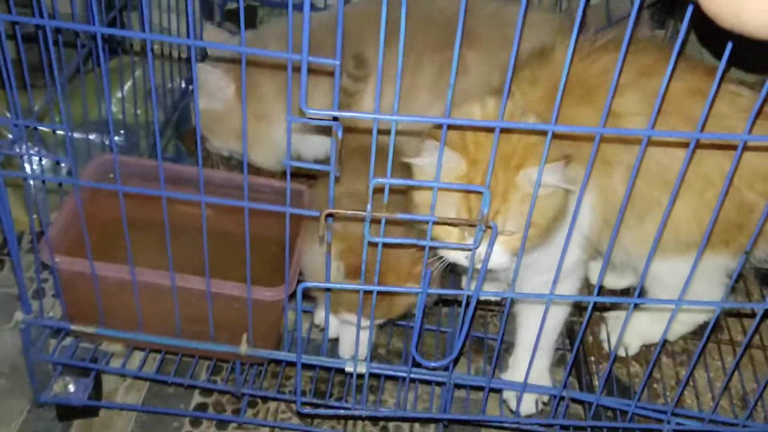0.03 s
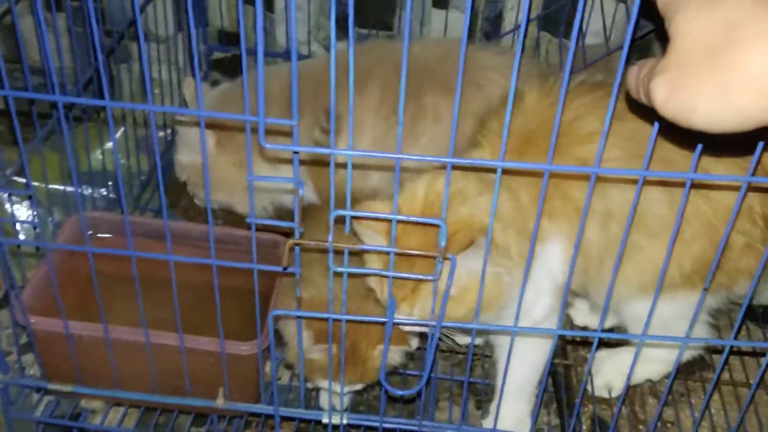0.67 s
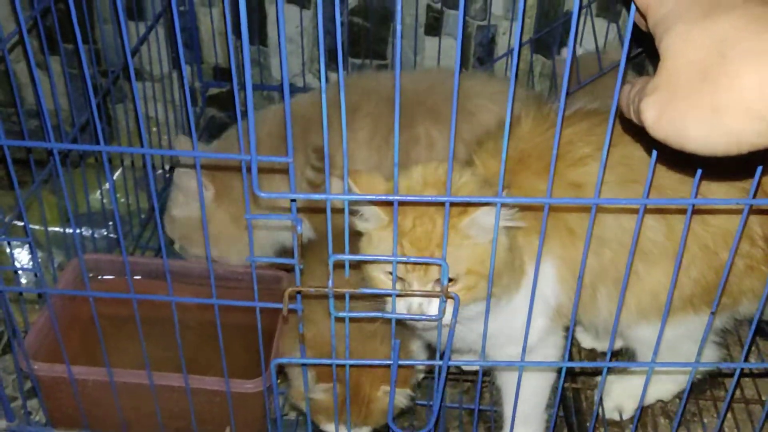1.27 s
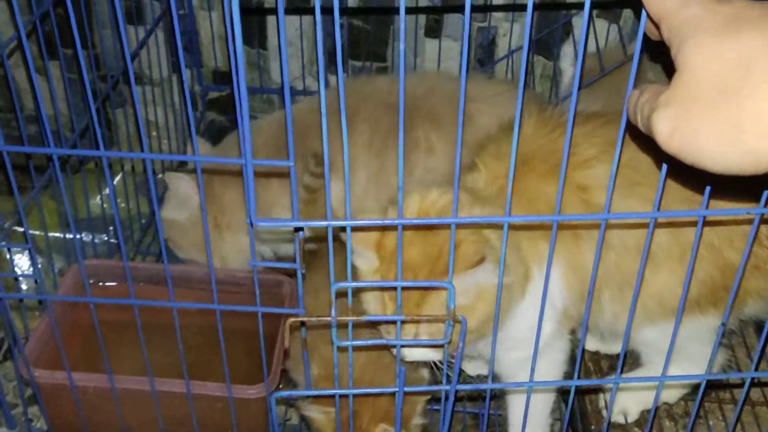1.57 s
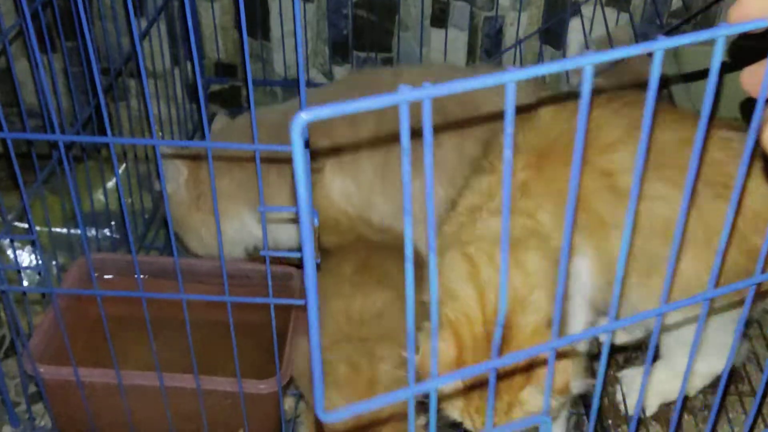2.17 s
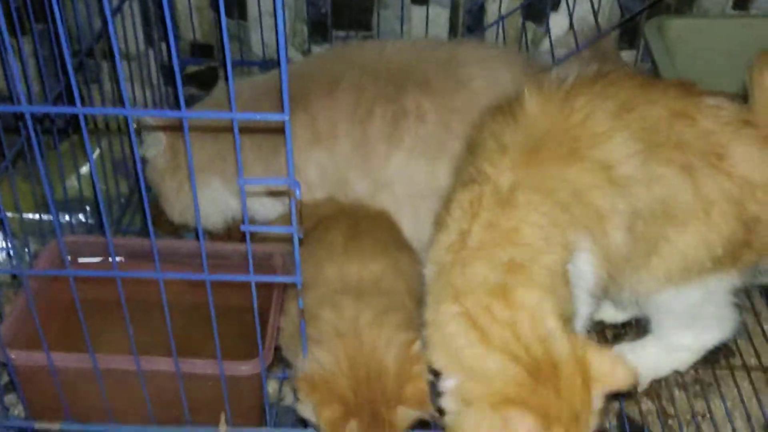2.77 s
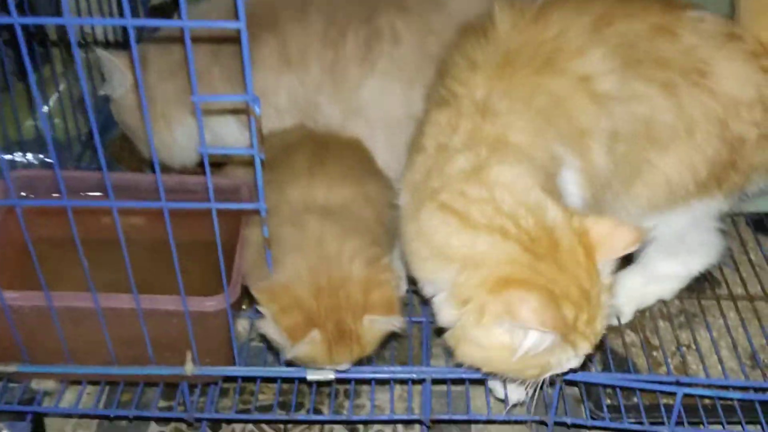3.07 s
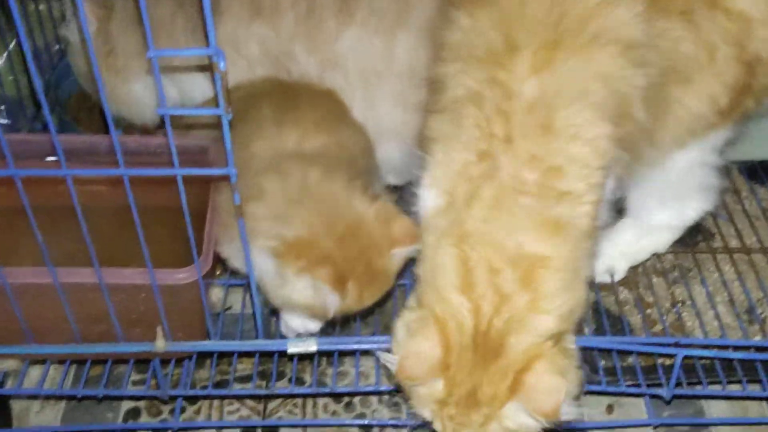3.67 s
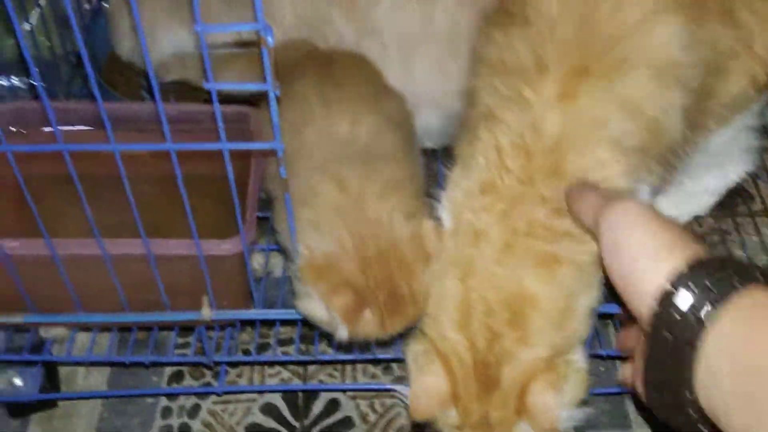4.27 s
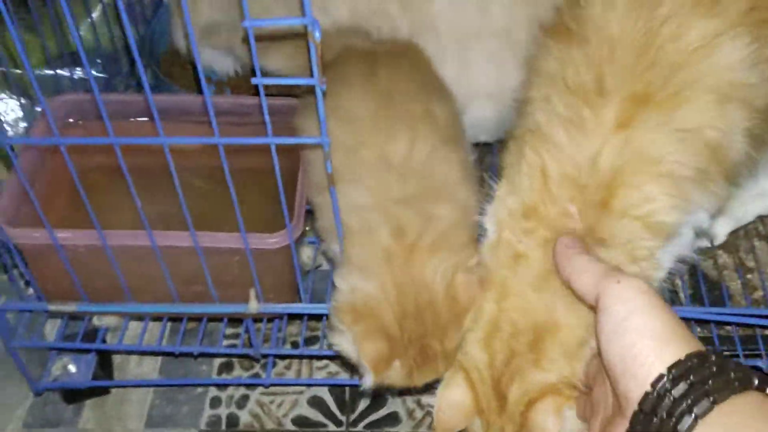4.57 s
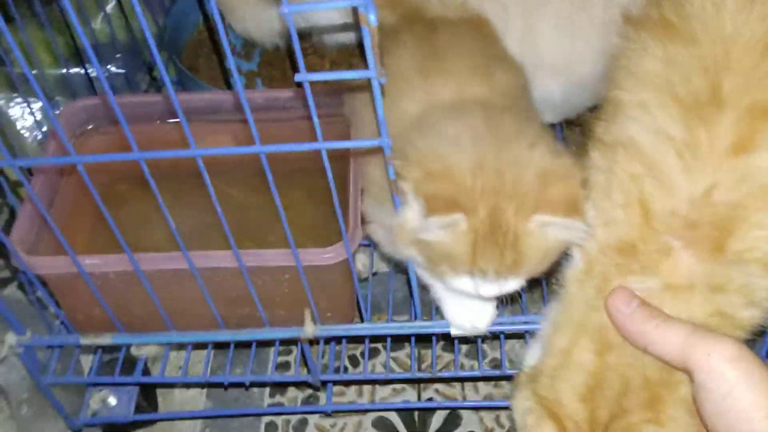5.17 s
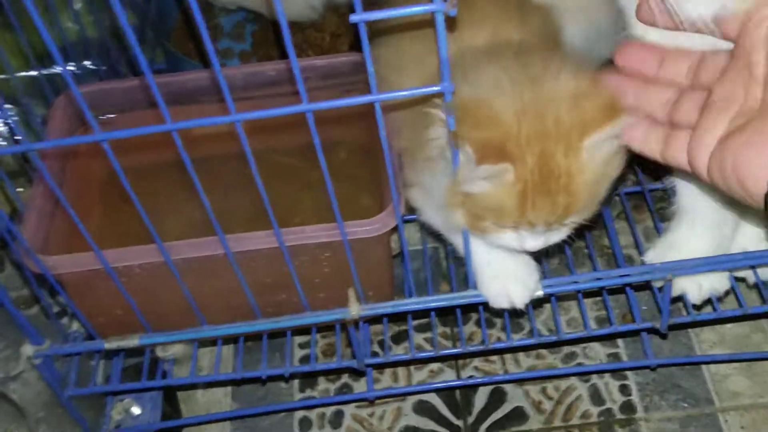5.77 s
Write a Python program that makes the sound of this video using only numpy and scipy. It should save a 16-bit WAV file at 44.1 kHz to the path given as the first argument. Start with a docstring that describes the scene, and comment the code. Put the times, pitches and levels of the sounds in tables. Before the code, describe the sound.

Cats feed in a wire cage, making light, irregular knocks and scrapes on the bars and tray. The door squeaks faintly and rubs as it swings open. Crisp crackles close on the left build into a brief rustle, a few scuffs and soft paw bumps follow, and one sharp clack rings through the hard room. A faint handling rumble lies underneath.

```python
"""Cats feed in a wire cage in a hard, tiled room, heard from the stereo microphones of a hand-held camera.
Paws bump and scrape; light knocks sound the tray, frame, wires and bars. A faint, thin whistle wavers.
The door squeaks and rubs as a hand swings it open and reaches in. Something crisp crackles right by the
left microphone, a few scuffs follow, and one sharp clack rings through the room. Underneath lie the
soft stir of fur and chewing, room tone and a faint handling rumble."""
import sys
import numpy as np
from scipy import signal
from scipy.fft import rfft, irfft, next_fast_len
from scipy.io import wavfile
from scipy.ndimage import uniform_filter1d, map_coordinates

SR = 44100
rng = np.random.default_rng(int(sys.argv[2]) if len(sys.argv) > 2 else 0)


def put_to_file(sound):
    """Save the sound as 16-bit audio at rate SR, in the file named by the first command-line argument."""
    columns = np.atleast_2d(sound).T  # one column per channel
    safe = np.clip(columns, -1, 1)
    whole_steps = np.round(safe * 32767)
    wavfile.write(sys.argv[1], SR, whole_steps.astype(np.int16))


N = 265482

# Levels in the tables are relative: each layer gets its own gain further down.
# light knocks on the cage: start_s, level_db, tray_offset_db, wires_offset_db, bar_offset_db, bar_hz
KNOCKS = [(0.06, -45.5, -8.5, -3, 5.5, 1600), (0.0864, -49.5, -30, 13, 0, 2130),
          (0.166, -54, -18, 13, -1, 1780), (1.241, -65, -21, -15, 1, 1310), (1.284, -71, -6, -15, 2, 1290),
          (1.304, -64, 4, -15, -3, 1000), (1.332, -59, -11, -12, -1, 1900),
          (1.442, -69, -17, -14, -1, 1260), (1.4704, -52, -12, -18, -2, 1140),
          (1.48, -62, -15, -12, -4, 1480), (1.531, -61.5, -5, -19, 11, 1790),
          (1.551, -60, -19, 11, -12, 1870), (1.564, -47, -13.5, -5, -9, 1290),
          (1.573, -50, -10, -3, -1, 1770), (1.583, -57, -9, -8, -5, 1270), (1.647, -63, -15, -15, 9, 1240),
          (1.657, -56.5, -20, -10, 4, 1790), (1.7107, -36.5, -38, -8, -5, 3110),
          (1.718, -45.5, -34, -3.5, -16, 1620), (1.732, -45.5, -31, -8, -3, 2960),
          (1.8681, -45, -22, -7.5, 0, 2050), (1.9332, -53.5, -15, -16, 5, 1640),
          (1.9925, -50, -5, -12, 6.5, 1530), (2.011, -42, -6.5, -11, 2, 1140),
          (2.019, -43.5, -5, -16, -3, 1700), (2.0372, -45.5, -4, 8, -5, 1680),
          (2.1807, -49.5, -13.5, -11, -6, 1590), (2.203, -54, -12.5, 4, -10, 1890),
          (2.308, -55.5, -9, -19, 0, 1520), (2.335, -51.5, -11, -18, 6, 1800),
          (2.354, -52, -14, -19, 1, 1700), (2.37, -55, -10, -19, -2, 1400), (2.385, -50, -5, -4, 4, 1880),
          (2.406, -42, -8.5, -6, 1.5, 1650), (2.4505, -56, -22, -4, 2, 1980),
          (2.457, -45, -30, -2.5, -3, 4320), (2.733, -60, 0, -17, 17, 930),
          (2.769, -42.5, -13, 0, -1, 1640), (2.8803, -53.5, -1, 4.5, 3, 750),
          (2.953, -52.5, -9, -16, 2, 1590), (3.0074, -34.5, -21, 0.5, -8, 1270),
          (3.025, -46.5, -11, 1, -8, 1490), (3.322, -43.5, -10, 1, 0.5, 1080),
          (3.37, -57.5, -8, -7, 9, 1300), (3.4981, -42, -16, -16, -9, 1150),
          (3.645, -53.5, -11, 4, -4.5, 1340), (4.044, -45.5, -18, -21, 1, 1095),
          (4.2667, -50.5, -26, 6.5, 5, 1880), (4.278, -52.5, -25, -6, 8, 1060),
          (4.301, -51.5, -19, 1, 0, 1080), (4.337, -50, -17, -1, 6.5, 1300),
          (4.364, -49.5, -5, -15, 10, 1150), (4.421, -43.5, -7, 6, 2, 1160), (4.441, -54, -10, -2, 4, 1030),
          (4.452, -50, -5, 7, 8, 1250), (4.548, -59, -12, -15, 6, 1250), (4.592, -54, -9, -16, 3.5, 1320),
          (4.647, -57.5, -11, -11, 15, 1150), (4.6622, -46, -11.5, 3, 5, 950),
          (4.686, -44.5, -20, 1.5, -9, 1170), (4.797, -49, -15, -12, 5, 2390),
          (4.8641, -32.5, -15, -2, 0.5, 2344), (4.867, -43.5, -8, 7, 10.5, 946),
          (5.553, -63, -26, 14.5, -8, 1970), (5.9654, -57, -20, 13, 7, 4500)]
# spectra of the hollow floor tray, the frame and the thin wires: frequency_hz, level_db
TRAY_TONE = [(120, -15), (300, -11.5), (550, 10), (750, 1.5), (1100, 5), (1600, -21.5)]
FRAME_TONE = [(300, -13.5), (650, -13), (1000, -10.5), (1600, -1), (2400, -5), (3200, -3), (5000, -5.5),
              (7500, -12), (12000, -39.5)]
WIRE_TONE = [(1500, -7.5), (3500, -15.5), (5000, -10), (7000, -6.5), (9000, 4), (10200, -3), (12000, -5.5),
             (14200, -22)]
# soft paw bumps on the cage floor: start_s, level_db, pitch_hz
PAW_BUMPS = [(3.372, -62.5, 246), (4.219, -64.5, 403), (4.28, -64, 246), (4.468, -62, 156),
             (4.797, -67, 192), (5.13, -61, 253), (5.185, -60, 470), (5.402, -60.5, 450)]
# scrapes along the wires, and at 2.8 s gritty catches of the rubbing door: middle_s, length_s, level_db
SCRAPES = [(1.31, 0.27, -67), (1.46, 0.21, -67), (1.585, 0.032, -61), (1.66, 0.13, -65), (1.8, 0.62, -67),
           (2.08, 0.13, -64), (2.41, 0.18, -58), (2.8, 0.17, -59.5), (3.06, .12, -62.5), (3.73, 0.057, -55),
           (4.47, 0.17, -61), (4.69, 0.063, -53.5), (5.41, 0.047, -60)]
# crisp crackles right by the left microphone: start_s, level_db
CRACKLES = [(3.008, -33.5), (3.1463, -36), (3.2685, -47.5), (3.3135, -47), (3.384, -44), (3.3942, -33.5),
            (3.4124, -29), (3.421, -24), (3.4273, -18.5), (3.435, -33), (3.4520, -32.5), (3.5215, -42),
            (3.5332, -38), (3.54, -28), (3.5515, -42), (3.5927, -44), (3.599, -41), (3.6067, -43.5),
            (3.6225, -53), (3.6653, -45), (3.696, -39.5), (3.7413, -41), (3.7563, -38), (3.771, -31),
            (3.7812, -30), (3.829, -32), (3.894, -23), (3.9352, -16), (3.9497, -22), (3.957, -15),
            (4.257, -39.5), (4.2945, -46), (4.409, -39), (4.42, -47), (4.6625, -44), (5.1456, -42),
            (5.3548, -29)]
# pushes of the close rustle: peak_s, level_db, left_over_right_db
RUSTLE_PUSHES = [(3.764, -40, 2), (3.785, -34, 4), (3.8, -31.5, 7), (3.816, -37, 6), (3.836, -29, 7),
                 (3.86, -27.5, 4), (3.877, -24.5, 3), (3.902, -18, 3), (3.913, -22, -1), (3.927, -14, -1),
                 (3.936, -14, 1), (3.948, -15, 1), (3.962, -18, 2)]
# short hissing, rasping strokes: peak_s, level_db, rasp_offset_db, rise_db_per_s
STROKES = [(3.868, -40.5, 8, 800), (3.923, -45.5, 2, 1000), (3.962, -44, 4, 1000), (4.428, -45.5, 6, 1500),
           (4.871, -42, 4, 417), (4.925, -36.5, 4, 331), (5.288, -64, 14, 331), (5.357, -39.5, -24, 331)]
# spectra of the scrapes, crackles, rustle and the two parts of a stroke: frequency_hz, level_db
SCRAPE_TONE = [(250, -26), (550, -2.5), (850, -13), (1150, 1.5), (1700, -3), (2400, -4.5), (3500, -11),
               (6000, -16), (12000, -49)]
CRACKLE_TONE = [(2000, -48), (6000, -30.5), (8000, -14.5), (9200, -5.5), (10800, -3.5), (12000, 1.5),
                (13000, -6.5), (14300, -9)]
RUSTLE_TONE = [(1000, -58), (2500, -47), (3500, -33.5), (5000, -26), (7000, -14.5), (8200, -8.5),
               (9200, 2.5), (10000, -4), (10900, 2.5), (12300, 0), (14200, -10)]
HISS_TONE = [(3000, -31), (6500, -11), (8000, -2.5), (9100, 6), (10200, 3), (12000, 4), (14200, -10)]
RASP_TONE = [(200, -5), (1000, -4.5), (3000, -3.5), (5000, 5), (7000, 4), (10000, -1)]
# resonances of the clacking thing, and of the cage floor after it: pitch_hz, level_db, t60_s
CLACK_MODES = [(320, -42, 0.065), (920, 3, 0.01), (4470, -8.5, 0.015), (6080, -3, 0.0091),
               (8950, -2.5, 0.014)]
FLOOR_MODES = [(422, -51, 0.55), (684, -43, 0.53), (1180, -55.5, 0.93)]
# hinge squeaks and, in the second row, a faint whistle: start_s, length_s, from_hz, to_hz, level_db
THIN_TONES = [(0.699, 0.015, 1940, 1720, -57), (0.72, 0.31, 4766, 4720, -74.5),
              (1.35, 0.056, 10840, 10800, -64), (1.385, 0.13, 9000, 8300, -73),
              (1.808, 0.11, 10700, 10830, -62)]
# the door rubbing as it swings wide: middle_s, length_s, level_db
DOOR_RUBS = [(2.77, 0.27, -52.5), (2.885, 0.061, -54)]
# cats shifting their fur and paws: middle_s, length_s, level_db
STIRS = [(0.08, 0.96, -56), (1.75, 1, -62.5), (2.4, 0.32, -61.5), (3.0, 0.72, -55), (3.48, 0.1, -50.5),
         (3.89, 0.22, -52), (4.41, 0.47, -56), (4.83, 0.15, -45), (5.9, 0.43, -61)]
# spectra of the clack's crack, the rubbing door and the stirring cats: frequency_hz, level_db
CRACK_TONE = [(100, -20), (250, -0.5), (500, -1.5), (750, 0), (1100, 4.5), (1500, -0.5), (2500, -1),
              (4500, -2), (6000, -5.5), (9000, -1.5), (11000, -6), (14000, -17)]
RUB_TONE = [(120, -31), (220, -4), (285, 7), (370, 5), (450, -14), (540, 3.5), (680, -11), (950, -6),
            (1400, -20.5), (3000, -35)]
STIR_TONE = [(100, -4), (250, -4), (600, 0), (1200, -2.5), (2500, -1), (5000, -8.5), (9000, 2), (14000, -5)]
# jolts of the hand that holds the camera: middle_s, length_s, level_db
JOLTS = [(0.15, 0.08, -47), (0.33, 0.12, -37), (0.56, 0.31, -52.5), (2.48, 0.075, -42), (2.8, 0.67, -50),
         (3.16, 0.11, -45), (4.83, 0.38, -50)]
# spectra of the handling rumble and the room tone: frequency_hz, level_db
RUMBLE_TONE = [(15, 7), (30, -3), (55, -4.5), (100, -11), (170, -23.5), (300, -42), (600, -91)]
ROOM_TONE = [(25, -0.5), (70, -21), (140, -12.5), (300, -14.5), (800, -24), (2400, -35), (4500, -31),
             (7000, -40.5), (9000, -56), (14000, -42.5)]
# reverberation of the tiled room: frequency_hz, t60_s
ROOM_DECAY = [(150, 0.5), (600, 0.31), (2500, 0.47), (6000, 0.51), (9000, 0.52), (14000, 0.36)]
# treble balance of the two microphone ports: frequency_hz, left_over_right_db
PORT_BALANCE = [(4000, 0.5), (6500, -0.0), (8000, -4.5), (9000, -9), (10000, -1), (11000, 10), (12200, 8),
                (14000, 3.5)]

FIRM_DB, NOTE_LOSS_DB_PER_DB = -29.5, 0.3  # the further below firm a knock is, the less its bar sings
CLACK_S = 5.7408
CALM_DB, LIVELY_DB, DOOR_OPEN_S, ROUSE_S = -66.5, -58.5, 3.1, 1.8  # the cats liven up as the door opens
BAND_LIMIT_HZ = 14300


def knocks():
    """Each knock sounds the tray, frame, thin wires and the struck bar, which rings if the blow is firm."""
    tray, frame, wires, bars = np.zeros((4, 2, N))
    t = np.arange(SR // 8) / SR
    note_fade = amp(1.5 - 60 * t / 0.015) * (1 - np.exp(-t / 0.00053))
    for s, db, tray_db, wires_db, bar_db, hz in KNOCKS:
        add(tray, s, amp(db + tray_db) * contact(t60=0.031, alike=1.0, rebound_db=-6.0))
        add(frame, s, amp(db) * contact(t60=0.032, alike=0.21, rebound_db=-6.5))
        add(wires, s, amp(db + wires_db) * contact(t60=0.029, alike=0.083, rebound_db=-7.0))
        blow = contact(t60=0.021, alike=0.3, rebound_db=-6.5)
        add(bars, s, amp(db + bar_db - 2) * resonant(blow, hz, q=1.98))
        firmness = amp(NOTE_LOSS_DB_PER_DB * min(db + bar_db - FIRM_DB, 0))
        add(bars, s, amp(db + bar_db) * firmness * note_fade * np.sin(2 * np.pi * hz * t))
    tray = amp(4.5) * coloured(tray, TRAY_TONE)
    frame = amp(-1.4) * coloured(frame, FRAME_TONE)
    wires = amp(2.5) * coloured(wires, WIRE_TONE)
    return bars + tray + frame + wires


def contact(t60, alike, rebound_db):
    """A touch and two quick rebounds; each spot of the cage stresses other resonances."""
    touch = burst(t60, alike)
    size = touch.shape[1]
    touch *= 1 - np.exp(-np.arange(size) / SR / 0.0012)
    for delay_s in rng.uniform(0.0012, 0.0078, size=2):
        touch += amp(rebound_db) * np.roll(burst(t60, alike), int(delay_s * SR), axis=1)
    hz = np.fft.rfftfreq(size, 1 / SR)
    ripple = map_coordinates(rng.standard_normal(64), [12 * np.log(1 + hz / 900)], mode="nearest")
    spot_colour = amp(3 * np.tanh(ripple))
    lead = SR // 100  # space for the filter's pre-ring, which is cut off
    return irfft(rfft(np.roll(touch, lead, axis=1)) * spot_colour, size)[:, lead:]


def paws():
    """Things catch and scrape along the wires, the rubbing door grates, and paws bump dully on the cage floor."""
    scraping = coloured(catches(per_s=110, t60=0.016), SCRAPE_TONE)
    out = amp(-1) * gestures(SCRAPES) * scraping
    for s, db, hz in PAW_BUMPS:
        pad = signal.butter(2, [hz / 1.28, hz * 1.26], "band", fs=SR, output="sos")
        thud = signal.sosfilt(pad, burst(t60=0.067, alike=0.88))
        add(out, s, amp(db + 10.5) * thud / np.abs(thud).max())
    return out


def catches(per_s, t60):
    """Tiny catches at uneven gaps, each dying at once; stereo, rms 1."""
    starts = np.cumsum(rng.uniform(0.3, 1.7, size=4000)) * SR / per_s
    sizes = amp(rng.uniform(-9, 0, size=4000))
    impulses = np.bincount(starts.astype(int), sizes ** 2, minlength=N)[:N]
    power = signal.lfilter([1], [1, -amp(-60 / (t60 * SR)) ** 2], impulses)
    return unit(np.sqrt(power) * pair(0.21))


def crackles():
    """Brief snaps splinter and crumble, so close that the left microphone gets far more of them."""
    snaps = np.zeros((2, N))
    snap_t60_s, splinter_gap_s = 0.0039, 0.0026
    for s, db in CRACKLES:
        gain = amp(db + 6.5) * panned(12.5)
        crumbs = amp(-24) * burst(t60=0.04, alike=0)
        add(snaps, s, gain * (burst(snap_t60_s, alike=0) + crumbs))
        for delay_s in splinter_gap_s * np.cumsum(rng.uniform(0.32, 1, size=2)):  # two weaker splinters
            add(snaps, s + delay_s, gain * amp(-7.5) * burst(snap_t60_s, alike=0))
    return coloured(snaps, CRACKLE_TONE)


def rustle():
    """Close up, a crisp rustle swells out of dense snaps in a few pushes, each stopping short."""
    pushes = [amp(db) * panned(side_db) * swell(s, rise_db_per_s=798, fall_db_per_s=1100)
              for s, db, side_db in RUSTLE_PUSHES]
    level = np.sqrt(sum(push ** 2 for push in pushes))
    return level * unit(coloured(grainy(per_s=700, spread_db=2), RUSTLE_TONE))


def strokes():
    """Short hissing, rasping strokes: the first three roughen the close rustle, the rest are scuffs."""
    out = np.zeros((2, N))
    hiss = amp(3) * coloured(grainy(per_s=2000, spread_db=4), HISS_TONE)
    rasp = coloured(grainy(per_s=450, spread_db=4), RASP_TONE)
    for s, db, rasp_db, rise in STROKES:
        out += amp(db) * swell(s, rise, fall_db_per_s=556) * (hiss + amp(rasp_db - 5.5) * rasp)
    return out


def clack():
    """One hard blow, nearer the right microphone: well-damped modes and a sharp crack."""
    t = np.arange(SR // 8) / SR
    ring = sum(amp(db - 60 * t / t60) * np.sin(2 * np.pi * hz * t) for hz, db, t60 in CLACK_MODES)
    ring *= 1 - np.exp(-t / 0.00075)
    modes, crack = np.zeros((2, 2, N))
    add(modes, CLACK_S, np.array([np.roll(ring, 7), ring]))  # reaches the left port a little later
    add(crack, CLACK_S, burst(t60=0.026, alike=0.17) * (1 - np.exp(-t / 0.0017)))
    return panned(-1.6) * (amp(-14.5) * modes + amp(-17) * coloured(crack, CRACK_TONE))


def shudder():
    """The cage floor trembles on after the clack, in a few fuzzy bands."""
    t = np.arange(SR // 2) / SR
    out = np.zeros((2, N))
    for hz, db, t60 in FLOOR_MODES:
        band = resonant(pair(0.45, size=len(t)), hz, q=3.9)
        add(out, CLACK_S, amp(db - 60 * t / t60) * band)
    return out


def clack_echo():
    """The room returns the clack as an even wash with the colour of its crack."""
    wash = np.zeros((2, N))
    add(wash, CLACK_S, walls())
    return amp(-3) * coloured(wash, CRACK_TONE)


def door_rub():
    """The door rubs with a low judder as it swings wide."""
    judder = grainy(per_s=110, spread_db=3.8, alike=0.88)
    return gestures(DOOR_RUBS) * coloured(judder, RUB_TONE)


def thin_tones():
    """Unsteady glides: brief hinge squeaks, and a faint, thin, wavering whistle near 4.7 kHz."""
    tones = np.zeros((2, N))
    for s, length, from_hz, to_hz, db in THIN_TONES:
        arch = np.sin(np.linspace(0, np.pi, int(length * SR)))
        glide_hz = np.linspace(from_hz, to_hz, len(arch)) * (1 - 0.0213 * (1 - arch))  # sags at both ends
        hz = glide_hz + 60 * wobble(150)[:len(arch)]
        add(tones, s, amp(db) * arch * np.sin(2 * np.pi * np.cumsum(hz) / SR))
    return amp(3 * wobble(60) - 2) * tones


def stirring():
    """Fur, paws and chewing make a soft, grainy bed that swells whenever a cat shifts."""
    roused = np.clip((np.arange(N) / SR - DOOR_OPEN_S) / ROUSE_S + 0.5, 0, 1)
    level = gestures(STIRS, rest=amp(CALM_DB + (LIVELY_DB - CALM_DB) * roused))
    return amp(-1.5) * level * coloured(grainy(per_s=900, spread_db=1, alike=0.028), STIR_TONE)


def handling():
    """The hand on the camera makes a lumpy rumble, stronger in the left microphone."""
    rumble = unit(coloured(pair(0.14), RUMBLE_TONE) * amp(0.47 * wobble(21.64)))
    return gestures(JOLTS, rest=amp(-57)) * panned(5) * rumble


def room_tone():
    """The steady, low hush of the room."""
    return amp(-62) * coloured(pair(0.42), ROOM_TONE)


def room(x):
    """The hard walls answer a sound with a diffuse tail, drawn afresh each time."""
    mono = x.sum(axis=0)[None] / np.sqrt(2)
    return signal.fftconvolve(mono, walls(), axes=1)[:, :N]


def walls():
    """A diffuse tail: each frequency dies at its own speed; long waves reach both microphones alike."""
    hz, t, (mid, side) = signal.stft(pair(0, size=SR * 3 // 4), SR, nperseg=512)
    apart = (hz / np.hypot(hz, 600))[:, None]
    field = np.array([mid + apart * side, mid - apart * side]) / np.hypot(1, apart)
    decay = amp(-60 * t / along(ROOM_DECAY, hz)[:, None])
    tail = signal.istft(field * decay, SR, nperseg=512)[1]
    spectrum = rfft(tail, SR)  # one bin per Hz; evened out, so the tail has no pitch of its own
    local_power = uniform_filter1d(np.abs(spectrum) ** 2, size=120)
    spectrum *= np.sqrt(along(ROOM_DECAY, np.arange(spectrum.shape[1])) / local_power)
    tail = irfft(spectrum, SR)[:, :tail.shape[1]]
    tail *= 1 - np.exp(-np.arange(tail.shape[1]) / SR / 0.00064)
    return tail / np.linalg.norm(tail[0])


def amp(db):
    """Decibels to gain."""
    return 10 ** (np.asarray(db) / 20)


def unit(x):
    """Scale to rms 1."""
    return x / np.sqrt(np.mean(x ** 2) + 1e-20)


def along(points, hz):
    """Read (frequency_hz, value) points on a log frequency axis."""
    frequencies, values = np.transpose(points)
    return np.interp(np.log(hz + 1), np.log(frequencies + 1), values)


def wobble(per_s):
    """A smooth random curve with per_s knots a second."""
    return map_coordinates(rng.standard_normal(int(N * per_s / SR) + 4), [np.arange(N) * per_s / SR])


def coloured(x, spectrum):
    """Causal filter with the given spectrum; white noise keeps its power."""
    size = 2 * next_fast_len(N // 2 + 8192)
    gain = unit(amp(along(spectrum, np.fft.rfftfreq(size, 1 / SR))))
    cepstrum = irfft(np.log(gain), size)
    cepstrum[1:size // 2] *= 2  # folded for minimum phase
    cepstrum[size // 2 + 1:] = 0
    return irfft(rfft(x, size) * np.exp(rfft(cepstrum)), size)[..., :N]


def resonant(x, hz, q):
    """One resonance with steep skirts; white noise keeps its power."""
    b, a = signal.iirpeak(hz, q, fs=SR)
    return signal.lfilter(b, a, signal.lfilter(b, a, x)) * np.sqrt(2 * SR * q / (np.pi * hz))


def pair(alike, size=N):
    """White noise for two microphones that share the fraction `alike` of its power."""
    common, *own = rng.standard_normal((3, size))
    return np.sqrt(alike) * common + np.sqrt(1 - alike) * np.array(own)


def burst(t60, alike):
    """Stereo noise that falls 60 dB in t60 seconds."""
    t = np.arange(SR // 8) / SR
    return pair(alike, size=len(t)) * amp(-60 * t / t60)


def grainy(per_s, spread_db, alike=0):
    """Stereo noise of rms 1 made of tiny slips of uneven size."""
    return unit(pair(alike) * amp(spread_db * np.clip(wobble(per_s), -2, 2)))


def swell(peak_s, rise_db_per_s, fall_db_per_s):
    """Gain of a push that grows to its peak and then dies."""
    t = np.arange(N) / SR - peak_s
    return amp(np.minimum(rise_db_per_s * t, -fall_db_per_s * t))


def gestures(rows, rest=0):
    """Gain of smooth movements (middle_s, length_s, level_db), added in power to a resting gain."""
    t = np.arange(N) / SR
    arches = [amp(db) * np.cos(np.pi * np.clip((t - s) / length, -0.5, 0.5)) for s, length, db in rows]
    return np.sqrt(rest ** 2 + np.sum(np.square(arches), axis=0))


def panned(left_db):
    """Microphone gains with the left one left_db above the right, at constant power."""
    gains = amp(np.array([left_db, -left_db]).reshape(2, -1) / 2)
    return gains / np.sqrt(np.mean(gains ** 2, axis=0))


def add(track, s, sound):
    """Mix a sound into a track at s seconds."""
    part = track[:, round(s * SR):][:, :sound.shape[-1]]
    part += sound[..., :part.shape[-1]]


def scene():
    """The crackles and crisp rustle stay nearly dry; the cage, door and strokes carry more of the room."""
    cage = knocks() + paws()
    snaps, crisp, rasps = crackles(), rustle(), strokes()
    tones_and_rub = thin_tones() + door_rub()
    blow = clack()
    reverb = room(amp(-2.5) * cage + amp(-5.5) * tones_and_rub)
    reverb += room(amp(-13) * snaps + amp(-10.5) * crisp + rasps)
    direct = cage + snaps + crisp + rasps + tones_and_rub + blow + shudder()
    return direct + clack_echo() + reverb + stirring() + handling() + room_tone()


def record(dry):
    """Each microphone port colours the treble in its own way; the camera cuts off at its band limit."""
    size = next_fast_len(N + 8192)
    hz = np.fft.rfftfreq(size, 1 / SR)
    heard = rfft(dry, size) * panned(along(PORT_BALANCE, hz))
    return irfft(heard / np.sqrt(1 + (hz / BAND_LIMIT_HZ) ** 300), size)[:, :N]


dry = scene()
out = record(dry)
put_to_file(out)
```